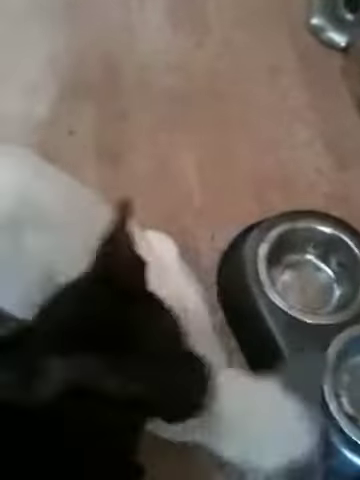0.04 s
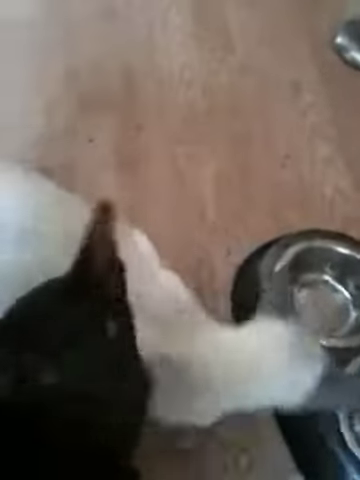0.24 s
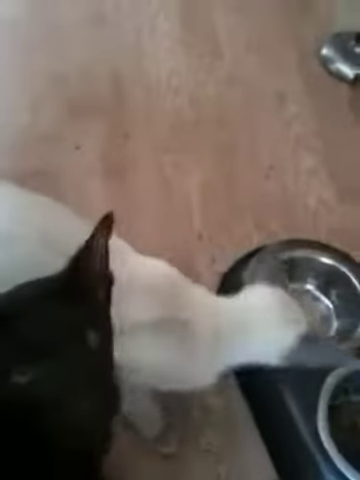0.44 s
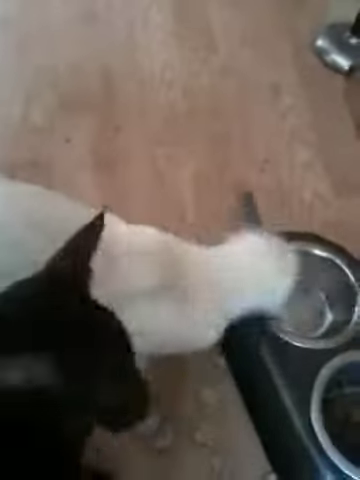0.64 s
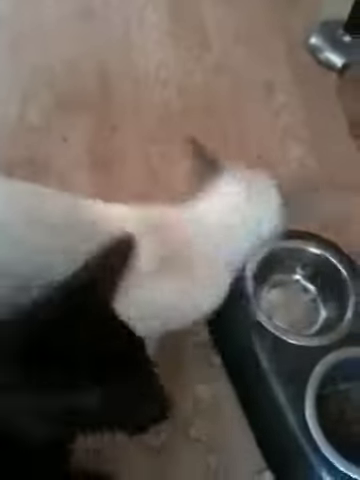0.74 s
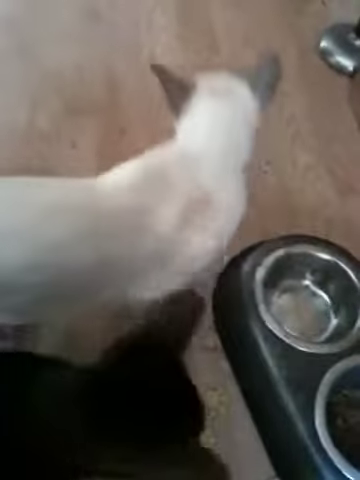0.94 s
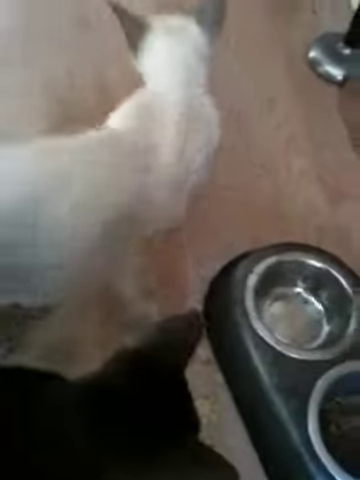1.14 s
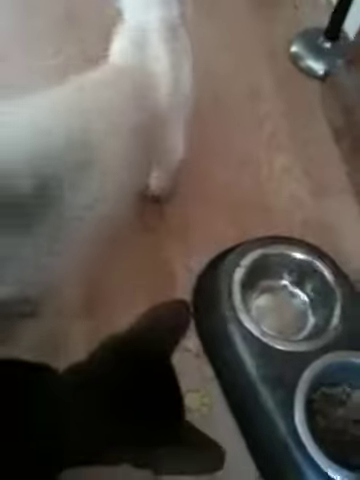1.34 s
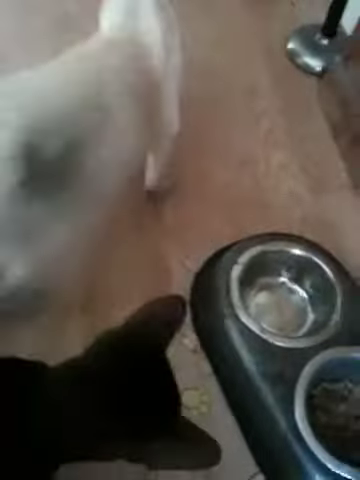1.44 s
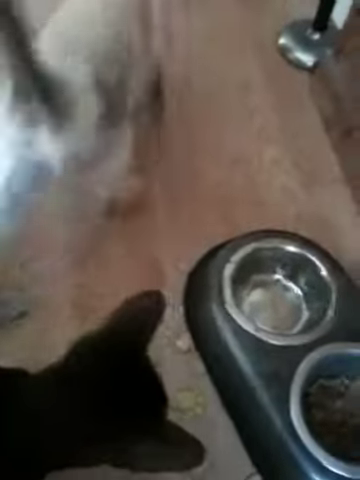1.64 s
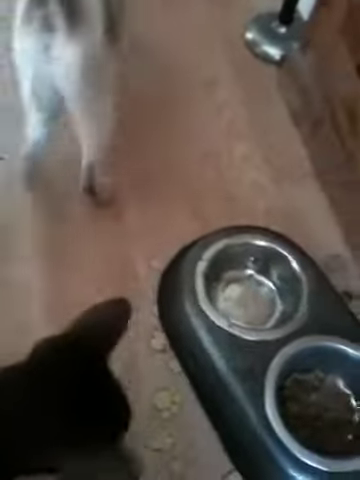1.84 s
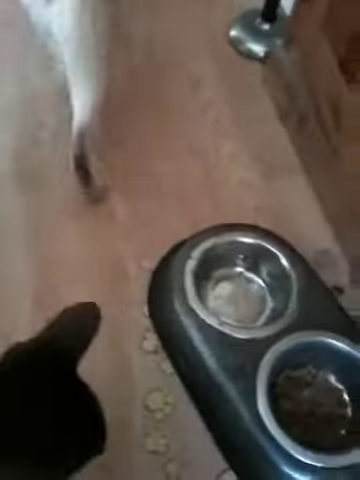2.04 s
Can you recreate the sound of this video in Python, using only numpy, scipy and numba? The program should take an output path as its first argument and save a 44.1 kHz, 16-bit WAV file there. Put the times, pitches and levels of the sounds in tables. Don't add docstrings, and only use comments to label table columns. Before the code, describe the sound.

Dry biscuits pour into a stainless-steel pet bowl, ringing sharply at first and duller as it fills, then scattered ticks, a small thin tink and near quiet, heard close on a phone in a small kitchen.

```python
import sys
import numpy as np
from scipy import signal
from scipy.fft import rfft, irfft
from scipy.io import wavfile
from scipy.ndimage import uniform_filter1d, minimum_filter1d
from numba import njit

SR = 44100
rng = np.random.default_rng(int(sys.argv[2]) if len(sys.argv) > 2 else 0)


def transcribe(signal):
    frames = np.atleast_2d(signal).T
    limited = np.clip(frames, -1, 1)
    pcm = np.round(limited * 32767).astype(np.int16)
    wavfile.write(sys.argv[1], SR, pcm)


def boost(x):
    u = np.asarray(x, float) / 20
    return 10 ** u


N = 92610

# pitch in Hz, level in dB.
TICK_COLOUR = [(120, -27.5), (200, -9.5), (311, -4.5), (558, -12.5), (836, -5), (1740, -12.5), (2700, -7),
               (3130, -15), (3600, -8.5), (4430, -7.5), (16000, -31)]


def curve(table, x):
    return np.interp(x, *np.array(table, float).T[:2])


def colour(x, table):
    hz, db = np.array(table, float).T
    freqs = np.fft.rfftfreq(len(x), 1 / SR)
    gain = boost(np.interp(np.log(freqs + 1), np.log(hz), db))
    return irfft(rfft(x) * gain / np.sqrt(np.mean(gain ** 2)), len(x))


def band_filter(x, order, hz, kind):
    return signal.sosfilt(signal.butter(order, hz, kind, fs=SR, output="sos"), x)


def ring(x, hz, t60):
    radius = np.exp(-np.log(1000) / (max(t60, .002) * SR))
    angle = 2 * np.pi * min(hz, .45 * SR) / SR
    return signal.lfilter([np.sin(angle)], [1, -2 * radius * np.cos(angle), radius * radius], x)


def train(times, sizes):
    return np.bincount(np.clip(times * SR, 0, N - 1).astype(int), sizes, N)


def burst(x, decay_s):
    return signal.lfilter([1], [1, -np.exp(-1 / (decay_s * SR))], x) * rng.standard_normal(N)


def house_hush():
    # pitch in Hz, level in dB per Hz.
    hush_colour = [(25, -19), (95, -17), (160, 1), (420, -7.5), (560, -13.5), (16000, -23)]
    return boost(-70.5) * colour(rng.standard_normal(N), hush_colour)


def kitchen_echo(dry):
    t = np.arange(int(.5 * SR)) / SR
    room_t60_s, first_echo_s = 0.53, .004
    tail = rng.standard_normal(len(t)) * boost(-60 * t / room_t60_s) * (t > first_echo_s)
    tail = signal.lfilter(*signal.butter(1, [350, 4670], "band", fs=SR), tail)
    return boost(-13) * signal.fftconvolve(dry, tail / np.sqrt(np.sum(tail ** 2)))[:N]


def rumble(effort):
    noise = signal.lfilter(*signal.butter(2, [28, 300], "band", fs=SR), rng.standard_normal(N))
    return boost(-40.5) * 10 * effort * noise


def squeaks():
    # start in seconds, length in seconds, first pitch in Hz, last pitch in Hz, level in dB.
    scrapes = [
        (1.495, 0.048, 3100, 2680, -66),
        (1.525, 0.03, 4900, 4500, -69),
    ]
    t, out = np.arange(N) / SR, 0
    for start, length, hz0, hz1, db in scrapes:
        progress = np.clip((t - start) / length, 0, 1)
        rough = 1 + 2 * uniform_filter1d(rng.standard_normal(N), size=90)
        turns = np.cumsum(hz0 + (hz1 - hz0) * progress) / SR
        out = out + boost(db) * np.sin(np.pi * progress) * rough * np.sin(2 * np.pi * turns)
    return out


def shuffle():
    # time in seconds, level in dB.
    shuffle_level = [
        (0, -42.5),
        (.2, -45.5),
        (.95, -42.5),
        (1.2, -55),
        (1.54, -64.5),
        (1.59, -88),
        (1.9, -66),
        (2.0, -60.5),
        (2.1, -63.5),
    ]
    grains_per_s = 1700
    grains = (rng.random(N) < grains_per_s / SR) * boost(1.2 * rng.exponential(size=N))
    rub = colour(burst(grains, 0.00081), TICK_COLOUR)
    return rub / rub.std() * boost(curve(shuffle_level, np.arange(N) / SR) - 8)


def knocks():
    # time in seconds, level in dB, pitch in Hz, t60 in seconds.
    dull_knocks = [(0.636, -45, 369, 0.029), (0.9815, -17, 300, 0.0097), (0.856, -56, 1325, 0.35),
                   (0.97, -50, 1195, 0.15), (0.944, -49, 833, 0.055), (0.972, -56.5, 766, 0.22),
                   (1.05, -57.5, 840, 0.12), (1.09, -59, 851, 0.077), (1.201, -53.5, 827, 0.068),
                   (1.294, -60, 395, 0.048), (1.328, -55, 1400, 0.05), (1.347, -52.5, 2327, 0.047),
                   (1.383, -57.5, 278.8, 0.02), (1.6245, -57.5, 650, 0.016), (1.868, -66.5, 506, 0.026)]
    out = np.zeros(N)
    for s, db, hz, t60 in dull_knocks:
        blow = train(np.array([s]), [boost(db) * 0.09])
        out += ring(ring(blow, hz, t60), hz * 1.106, t60 / 3)
    return band_filter(out, 4, 190, "high")


def tink():
    # pitch in Hz, level in dB.
    tink_tones = [(7085, -2), (8130, -6), (8880, -8), (9460, -14.5), (10240, -8.5), (12120, -12.5),
                  (12940, -12)]
    at_s, t60_s = 1.3455, 0.085
    kick = train(at_s + np.array([0, .0015]), boost(-41 + np.array([0, -4])))
    hiss = boost(-54) * burst(train(np.array([at_s]), [1.]), 0.019)
    out = band_filter(hiss, 3, [6300, 14000], "band")
    for hz, db in tink_tones:
        for stretch, longer in ((1, 0.93), (1.02, 0.24), (1.045, 0.23)):
            out = out + boost(db) * ring(kick, hz * stretch, t60_s * longer)
    return out


def ticks():
    # time in seconds, peak level in dB, colour in Hz.
    scoop_ticks = [(0.006, -31.5, 4550), (0.0138, -27, 4400), (0.025, -33, 4420), (0.028, -36.5, 5200),
                   (0.033, -36, 3500), (0.058, -39, 3000), (0.0638, -37, 4640), (0.0783, -30, 5110),
                   (0.0856, -32.5, 4400), (0.0908, -33.5, 4400), (0.0981, -34.5, 2530),
                   (0.1096, -37.5, 4270), (0.113, -41.5, 5000), (0.1333, -28.5, 4720),
                   (0.1621, -33.5, 1390), (0.183, -33.5, 4430)]
    # time in seconds, peak level in dB, colour in Hz, t60 in seconds.
    stray_ticks = [(1.173, -44.5, 2270, 0.018), (1.2, -33, 2280, 0.019), (1.237, -41, 1190, 0.017),
                   (1.243, -41, 5640, 0.052), (1.26, -39.5, 6250, 0.016), (1.2895, -31, 4510, 0.026),
                   (1.33, -40.5, 5070, 0.061), (1.466, -53.5, 2287, 0.029), (1.48, -54, 5180, 0.065),
                   (1.494, -53.5, 3010, 0.03), (1.622, -54, 4576, 0.035), (1.625, -53, 1040, 0.027),
                   (1.638, -50.5, 4240, 0.053), (1.743, -57, 6870, 0.022), (1.805, -53.5, 2370, 0.028),
                   (1.806, -53, 4820, 0.03), (1.945, -55.5, 5385, 0.027), (1.979, -46.5, 6220, 0.019),
                   (1.986, -49.5, 5600, 0.11), (2.018, -62, 890, 0.032)]
    scoop_t60_s = 0.019
    t = np.arange(4000) / SR
    out = np.zeros(N)
    for s, db, hz, t60 in [(*row, scoop_t60_s) for row in scoop_ticks] + list(stray_ticks):
        noise = rng.standard_normal(len(t))
        fade = boost(-60 * t / max(t60, .004))
        body = signal.lfilter(*signal.iirpeak(min(hz, 15000), 2.5, fs=SR), noise * fade)
        snap = noise * np.exp(-t / 0.000067)
        click = signal.lfilter(*signal.butter(2, [hz / 9.7, 8300], "band", fs=SR), snap)
        one = 1.1 * body + 0.059 * colour(noise, TICK_COLOUR) * fade + 0.18 * click
        i = int(s * SR)
        out[i:i + len(t)] += (boost(db) * one / np.max(np.abs(one)))[:N - i]
    return out


@njit
def bank(s, gain, pole_re, pole_im, n):
    out = np.zeros(n)
    for k in range(len(pole_re)):
        a, b, j = 0., 0., 0
        for i in range(pole_re.shape[1] * 128):
            c, d = pole_re[k, i >> 7], pole_im[k, i >> 7]
            while s[j] <= i:
                a += gain[j, k]
                j += 1
            a, b = a * c - b * d + 1e-14, a * d + b * c
            out[i] += b
    return out


def steel_modes():
    # pitches in Hz, then for each one a row of level in dB, t60 in seconds.
    wall_hz = [684, 1065, 1324, 1732, 2579, 2902, 3456, 3822, 3974, 4199, 4449, 4549, 4672, 5415]
    wall_ring = [(-2.5, 1.1), (8.5, 1.09), (-8, 0.13), (-17, 0.47), (-12, 0.15), (-6, 0.08), (-4.5, 0.089),
                 (1, 0.15), (-15, 0.2), (-3.5, 0.11), (-4, 0.12), (2.5, 0.2), (-8, 0.32), (-1, 0.18)]
    # pitches in Hz, then their levels in dB.
    rim_hz = [5566, 5688, 5814, 6742, 7300, 8521, 8948, 9146, 9335, 10530, 11700, 12775, 13313, 15200]
    rim_db = [-2, 1, -6.5, 1.5, 4, -3.5, -1, -8.5, -6, -9, -11.5, -6, -14, -12.5]
    # pitch in Hz, level in dB.
    fine_level = [(650, -44), (1100, 3.5), (1410, -24), (2100, -23), (2900, -12), (3120, -34.5),
                  (3400, -16.5), (4560, -6), (4990, -3.5), (16000, -14.5)]
    wall = [(hz, *row) for hz, row in zip(wall_hz, wall_ring)]
    rim = [(hz, db, 0.19 * (5600 / hz) ** 0.68) for hz, db in zip(rim_hz, rim_db)]
    named = np.array(wall + rim, float)
    twins = named * [1 + .005, 1, .8]
    twins[:, 1] -= 4 + 9 * (named[:, 0] < 1200)
    fine_hz = 780 * (16000 / 780) ** rng.random(76) ** .6
    fine = np.c_[fine_hz, -4 + curve(fine_level, fine_hz), .12 * (4000 / fine_hz) ** .4]
    modes = np.r_[named, twins, fine]
    return modes, np.arange(len(modes)) >= 2 * len(named)


def biscuit_hits(mode_hz, is_fine):
    # time in seconds, peak in dB, favoured pitch in Hz, share of low ring in dB,
    # brightness in dB per octave.
    hits = [(0.2194, -14, 5890, -34, -6.8), (0.2283, -10, 4416, 0.5, -15.5), (0.2556, -6, 3800, -24.5, 0),
            (0.2658, -7, 4400, -31, 6.5), (0.2854, -8, 3900, -26.5, 2.5), (0.305, -6, 4520, -24, 1.5),
            (0.3188, -8.5, 4270, -17, -5), (0.3313, -13.5, 3860, -21.5, 5), (0.342, -17, 4550, -29, 2),
            (0.395, -12, 4560, -23, 0.1), (0.4099, -18, 4340, -21, -3), (0.424, -20.5, 4010, -15, -5),
            (0.45, -23, 8000, -25, 15), (0.4601, -15, 9800, -35, 5), (0.4675, -9, 5620, -30, -1),
            (0.4751, -15.5, 4240, -27.5, -12), (0.495, -20.5, 4320, 6, -14),
            (0.5467, -21, 5420, -10.5, -29), (0.6092, -15.5, 5670, -16.5, 1.5),
            (0.616, -18, 4450, -21, 13.5), (0.6573, -23, 4300, -13, 10), (0.6647, -21, 4200, -14, -1),
            (0.674, -22, 4980, -23, -2), (0.6871, -16, 4680, -24, -2), (0.7002, -20, 5690, -6, -1),
            (0.7364, -15.5, 5870, -14, -2), (0.748, -23.5, 5700, -20, -2), (0.7682, -19.5, 5424, -19, -3),
            (0.8121, -25.5, 5570, -14, 4), (0.8363, -28, 7100, -16, 11), (0.8567, -24.5, 5900, -21.5, 0.1),
            (0.8647, -21.5, 5540, -24, -5), (0.893, -28.5, 5770, -25, 6), (0.9427, -30, 5400, -40, -8),
            (0.97, -18.5, 4650, -37.5, -3), (1.0488, -29, 2460, -16, -4), (1.0921, -26.5, 5420, -35.5, -9),
            (1.1279, -36.5, 5370, -3, 5)]
    bounce_s, bounce_db, bounce_low_db = .003, -3.5, -15.5
    favour_db, favour_octaves = 14.5, 0.042
    s, db, hz, low_db, bright_db = np.array(hits, float).T
    bounce = np.arange(5)
    lag = np.cumsum(0.33 + rng.random((len(s), 4)), axis=1) * bounce_s
    s = np.c_[s, s[:, None] + lag].ravel()
    db = (db[:, None] - 8 + bounce_db * np.abs(bounce - .3)).ravel()
    hz, bright_db = np.repeat(hz, 5), np.repeat(bright_db, 5)
    low_db = (low_db[:, None] + bounce_low_db * (bounce > 0)).ravel()
    octaves_off = np.log2(mode_hz / hz[:, None])
    tone = favour_db * np.exp(-(octaves_off / favour_octaves) ** 2)
    tone += (low_db[:, None] + 16 - 12 * is_fine) * (mode_hz < 1500)
    tone += bright_db[:, None] * np.log2(np.maximum(mode_hz / 5000, 1))
    return s, db, tone


def biscuit_stream(mode_hz):
    # time in seconds, level in dB.
    stream_level = [
        (.205, -44),
        (.25, -28),
        (.34, -34.5),
        (.38, -34),
        (.5, -40),
        (.7, -39),
        (1.05, -66),
        (1.25, -66),
    ]
    biscuits_per_s, heap_db_per_s = 330, -8
    chance = rng.random((500, 2))
    s = stream_level[0][0] + np.cumsum(-np.log(chance[:, 0])) / biscuits_per_s
    db = curve(stream_level, s) + 0.5 * np.minimum(-np.log(chance[:, 1]), 3)
    db -= 80 * (s > stream_level[-1][0])
    bright = 4 * np.log2(np.maximum(mode_hz / 4000, 1))
    return s, db, bright + heap_db_per_s * s[:, None] * (mode_hz < 1200)


def bowl():
    modes, is_fine = steel_modes()
    mode_hz = modes[:, 0]
    s, db, tone = (np.concatenate(pair) for pair in zip(biscuit_hits(mode_hz, is_fine), biscuit_stream(mode_hz)))
    place = rng.standard_normal((len(s), len(modes), 2))
    scatter_db = 8.5 * np.where(mode_hz < 1200, .2, 1)
    gain = boost(modes[:, 1] + tone + scatter_db * place[..., 0]) * np.sign(place[..., 1])
    gain *= (boost(db) / np.sqrt(np.sum(gain ** 2, axis=1)))[:, None]
    blocks, damp_per_s, wobble_hz = 520, 3.48, 11
    damp = 1 + damp_per_s * np.arange(blocks) * 128 / SR
    wobble = wobble_hz * 3 * uniform_filter1d(rng.standard_normal((len(modes), blocks)), size=9, axis=1)
    pole = np.exp((2j * np.pi * (modes[:, :1] + wobble) - np.log(1000) * damp / modes[:, 2:]) / SR)
    order = np.argsort(s)
    blow_samples = np.r_[s[order] * SR, np.inf]
    steel = bank(blow_samples, gain[order], pole.real.copy(), pole.imag.copy(), N)
    crack_db, drier_db_per_s = -11.5, 9.5
    crack = colour(burst(train(s, boost(db + crack_db + drier_db_per_s * s)), 0.0014), TICK_COLOUR)
    effort = uniform_filter1d(np.abs(steel), size=800)
    return band_filter(steel + crack, 3, 511, "high"), effort


def scene():
    steel, effort = bowl()
    dry = steel + ticks() + shuffle() + knocks() + tink() + squeaks() + rumble(effort)
    dry = band_filter(dry, 2, 20, "high")
    return (dry + kitchen_echo(dry) + house_hush())[None]


def duck_treble(x):
    high = signal.sosfiltfilt(signal.butter(6, 8750, "high", fs=SR, output="sos"), x)
    level = uniform_filter1d(np.abs(high), size=200, axis=1)
    ahead_s, rise_db = 0.0047, 6.5
    later = np.roll(level, -int(ahead_s * SR / 2), axis=1)
    coming = -minimum_filter1d(-later, size=600, axis=1)
    sudden = (coming > boost(rise_db) * 2 * level) * (coming > np.roll(coming, 600, axis=1))
    return x - uniform_filter1d(1. * sudden, size=100, axis=1) * high


def starve(x):
    frame, bins, top = 1024, 12, 504
    z = signal.stft(x, nperseg=frame)[2][0]
    power = (np.abs(z[:top]) ** 2).reshape(-1, bins, z.shape[1]).mean(axis=1)
    loud = power[4:14].mean(axis=0)
    loud = np.maximum(loud, np.roll(loud, -1))
    luck = uniform_filter1d(rng.standard_normal(power.shape), size=3, axis=1) * np.sqrt(3)
    keep = power > loud * boost(2 * (-19.5 + 2.5 * luck))
    keep[:18] = True
    z[:top] *= np.repeat(keep, bins, axis=0)
    return signal.istft(z, nperseg=frame)[1][None, :N]


def band_limit(x):
    return signal.sosfilt(signal.butter(12, 16470, fs=SR, output="sos"), x)


def record(dry):
    patchy = starve(duck_treble(dry))
    mix = signal.sosfilt(signal.ellip(8, .3, 50, 15900, fs=SR, output="sos"), patchy)
    return band_limit(mix)


dry = scene()
out = record(dry)
transcribe(out)
```